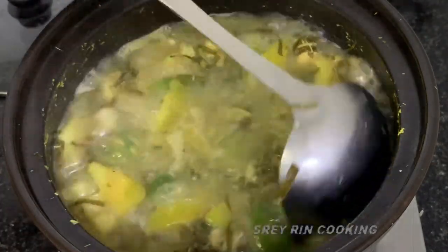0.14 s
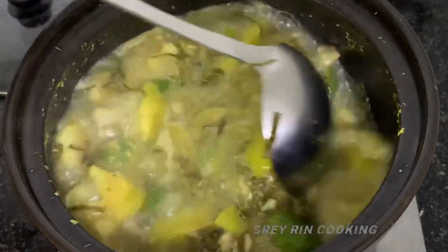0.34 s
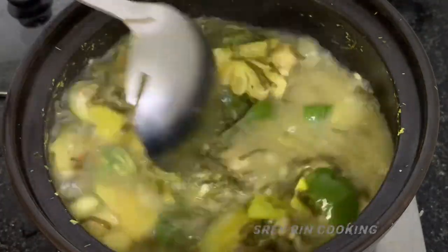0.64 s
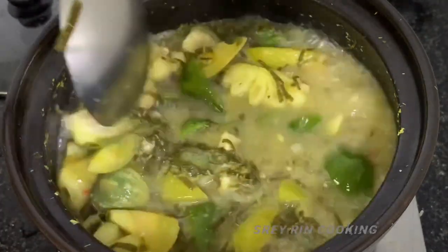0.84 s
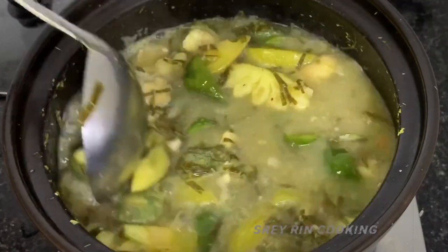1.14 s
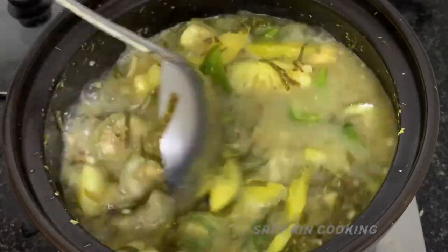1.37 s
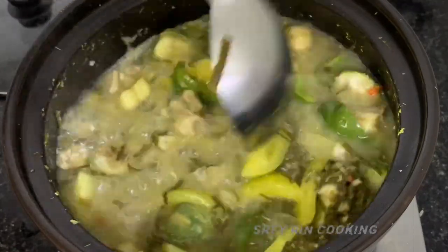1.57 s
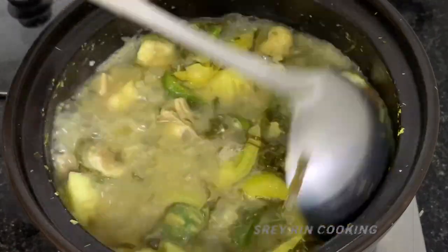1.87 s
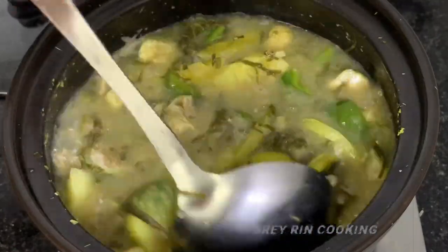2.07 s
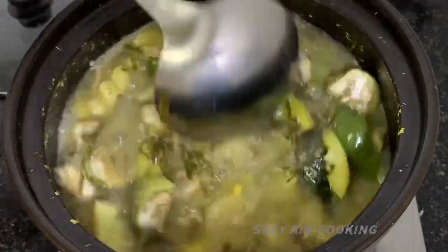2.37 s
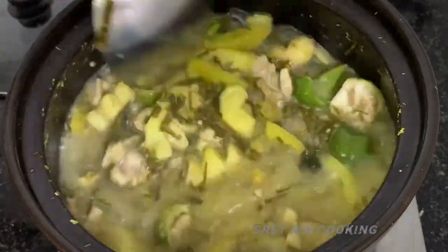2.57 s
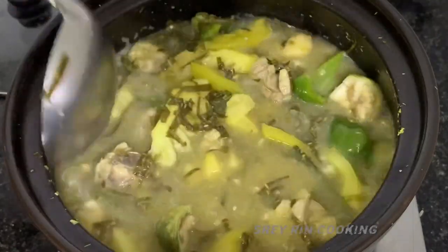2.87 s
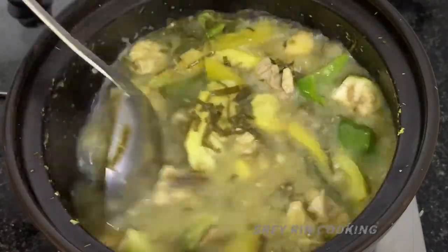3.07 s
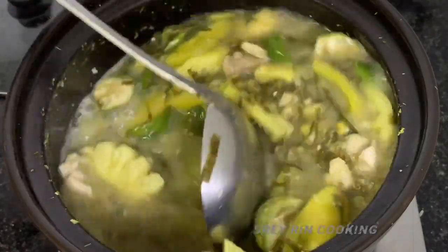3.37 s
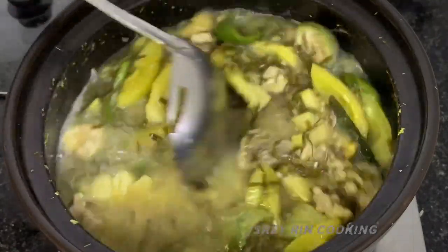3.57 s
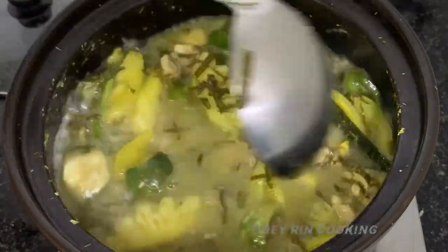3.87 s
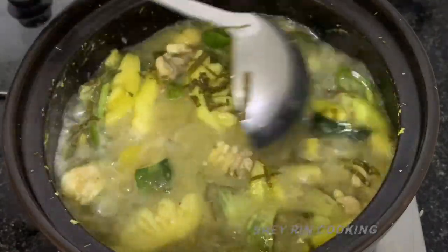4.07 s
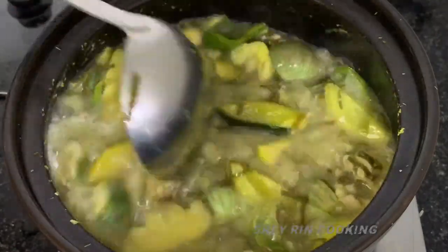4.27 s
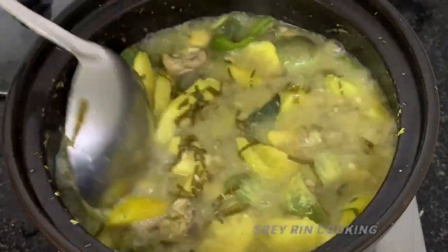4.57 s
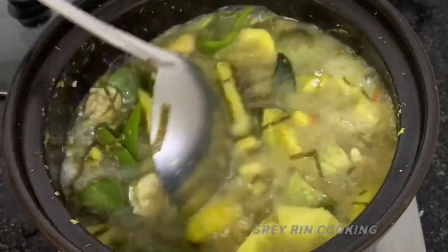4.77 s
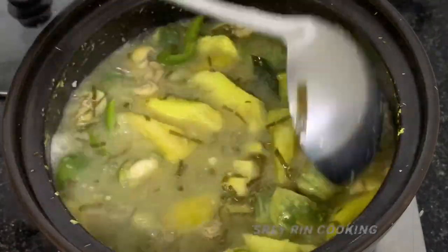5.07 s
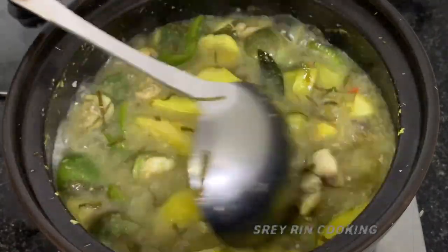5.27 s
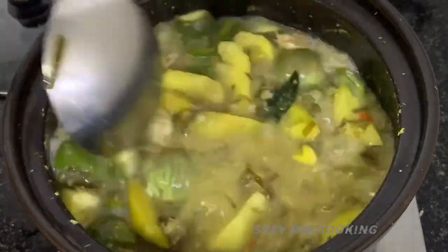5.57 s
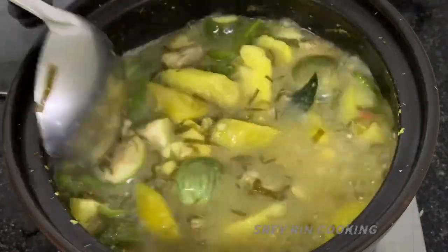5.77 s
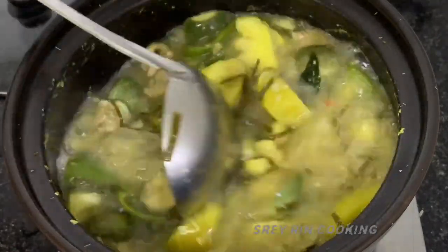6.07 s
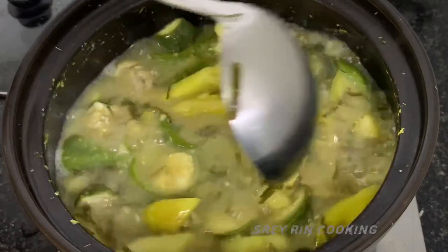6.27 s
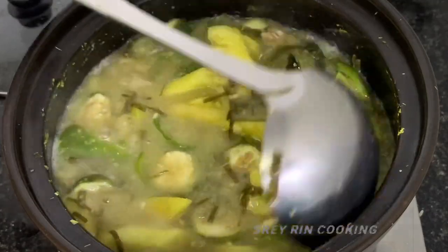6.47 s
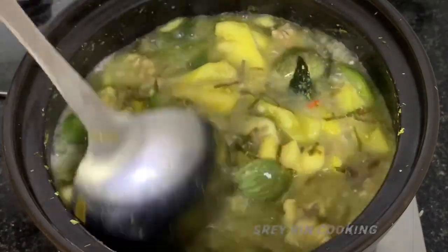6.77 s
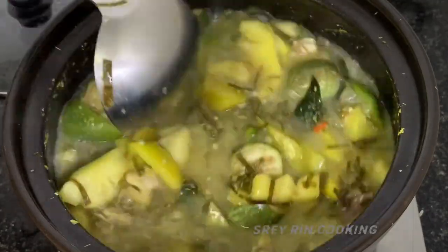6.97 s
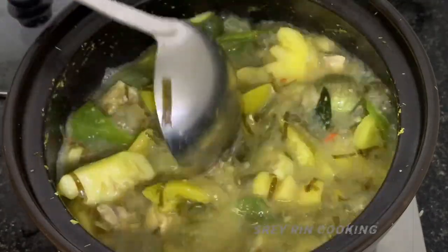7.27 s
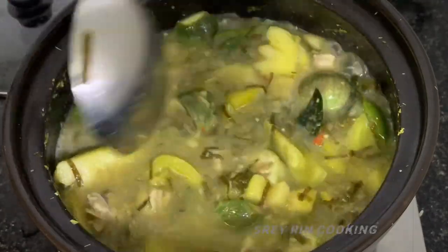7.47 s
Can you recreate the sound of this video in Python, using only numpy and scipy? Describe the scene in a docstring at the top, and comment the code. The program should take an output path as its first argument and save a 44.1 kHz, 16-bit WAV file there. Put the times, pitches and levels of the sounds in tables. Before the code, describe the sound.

Thick soup boils in a heavy pot, heard from just above the rim in a small, hard-walled kitchen. Short wet plops pop irregularly over smaller bubbles and a faint crackling froth, busiest at the very start. A gas burner rumbles and hisses softly underneath throughout. At about 1.9 seconds a steel ladle clinks sharply against the pot wall, followed by a brief soft scrape. Two more bright, quickly damped clinks come at 2.8 and 2.9 seconds, with light scraping after them and again around 3.5 seconds. The boil calms near 4 seconds and recovers by about 4.7, with the odd tiny droplet spitting. Another clink sounds at 5.7 seconds, and the bubbling eases briefly. At 7.2 seconds the ladle knocks the bottom with a muffled, wet thud. The soup keeps bubbling to the end, at about 7.6 seconds.

```python
"""Thick soup boils in a heavy pot over a rumbling, hissing gas burner in a small hard kitchen.
From the start, bursting bubbles ring as damped cavity resonators: short plops over crackling froth.
From 1.9 s a stirring steel ladle clinks on the wall and scrapes along it; the boil calms near 4 s.
It recovers, and calms again after a last clink at 5.7 s. At 7.2 s the ladle knocks the bottom, muffled
by the soup. The microphone pair is just over the rim, and the pot sounds reach its left side first."""
import sys
import numpy as np
from scipy import signal
from scipy.fft import rfft, irfft, next_fast_len
from scipy.io import wavfile
from scipy.ndimage import map_coordinates

SR = 44100
rng = np.random.default_rng(int(sys.argv[2]) if len(sys.argv) > 2 else 0)


def generate_wav(sig):
    """Save sig (samples, or channels by samples) to the path in sys.argv[1] as 16-bit PCM at SR."""
    pcm = np.round(np.clip(np.atleast_2d(sig).T, -1, 1) * 32767).astype(np.int16)
    wavfile.write(sys.argv[1], SR, pcm)


N = 336924


# the biggest bubbles: t/s, relative level/dB, f/Hz
BIG_BUBBLES = [(0.0106, -30.5, 1320), (0.0612, -27, 1010), (0.1054, -33, 1000), (0.3033, -28, 1060),
               (0.783, -41, 1560), (0.833, -31.5, 1270), (1.0085, -34.5, 1320), (1.1019, -33.5, 800),
               (1.1523, -35.5, 1050), (1.2354, -29, 1060), (1.2815, -29.5, 1050), (1.3283, -36, 970),
               (1.4262, -33.5, 630), (1.4453, -31.5, 1320), (1.506, -34.5, 1040), (1.8119, -39, 693),
               (2.3715, -42, 835), (2.4722, -30.5, 1190), (2.7139, -31.5, 930), (3.193, -29.5, 1570),
               (4.063, -34, 720), (4.7031, -41, 1080), (4.7724, -34, 1100), (4.9252, -34, 940),
               (5.1322, -34.5, 1380), (5.4116, -33.5, 1660), (5.4632, -28.5, 1050), (6.2239, -34, 956),
               (6.3717, -36, 650), (6.6337, -28.5, 2220), (7.0421, -30.5, 1980), (7.5402, -31, 1040)]
# how hard the soup seethes; stirring calms it twice: t/s, level/dB
SEETHING = [(0, -43), (.5, -51), (1.45, -51), (3.65, -48), (4.0, -66.5), (4.35, -64), (4.65, -51),
            (5.6, -53), (6.4, -58.5), (6.65, -51.5), (7.64, -51.5)]
def bubbling():
    """Superposition: single plops over a crowd of small bubbles and deep gulping pockets of steam."""
    seethe_db = envelope(SEETHING)
    seethe = amp(seethe_db)
    big = plopping(BIG_BUBBLES) + plopping(lesser_plops(seethe_db, count=72))
    small = crowd(centre_hz=1155, spread=0.553, cycles=1.0, count=1100, size=700)
    soup = big + amp(-2.5) * seethe * unit(coloured(small, AIR_SPACE))
    steam = crowd(centre_hz=205.4, spread=0.24, cycles=1.23, count=260, size=3000)
    deep = amp(-9) * seethe * unit(steam)
    near = placed(soup, pan_db=5, lead=0.0005)
    return near + amp(-8.5) * kitchen(soup) + placed(deep, pan_db=-7, lead=0.0001)


# resonances of the air over the soup: f/Hz, gain/dB
AIR_SPACE = [(100, -20.5), (250, 12), (380, -16), (620, 11), (810, 8.5), (1000, -0.5), (1450, 8),
             (1900, -4.5), (2600, -2.5), (5000, -19), (15000, -42.5)]
def plopping(rows, snap_t60=0.045):
    """Impulse excitation: a film snaps, its cavity rings, and soup falls back with a weaker plop."""
    s, db, hz = np.transpose(rows)
    wait, shift = rng.random((len(s), 2)).T
    cycles = 0.89 * (1000 / hz) ** 0.33  # lower bubbles ring for more cycles
    opening = bursts(s, amp(db - 2.5), hz, cycles, glide=0.0151)
    fall_s = s + 0.0032 + 0.013 * wait
    falling = bursts(fall_s, amp(db - 7.5), hz * (0.67 + 1.1 * shift), cycles, glide=0.022)
    snaps, t = np.zeros(N), np.arange(SR // 20) / SR
    for start, level_db in zip(s, db):
        add(snaps, start, amp(level_db - 5 - 60 * t / snap_t60) * rng.standard_normal(len(t)))
    return opening + falling + coloured(snaps + amp(-15.5) * opening, AIR_SPACE)


def lesser_plops(seethe_db, count):
    """Size scaling: harder seething makes bubbles louder and bigger, so lower. Rows: t/s, level/dB, f/Hz."""
    moment = (np.arange(count) + rng.random(count)) / count
    weakness, pitch = np.clip(rng.standard_normal((count, 2)), -1.5, 1.5).T
    surge_db = seethe_db[(moment * N).astype(int)] - seethe_db.mean()
    db = -40.5 + 0.62 * surge_db - 1.3 * weakness
    hz = 1121 * 2 ** (0.36 * pitch - 0.033 * surge_db)
    return np.transpose([moment * N / SR, db, hz])


def crowd(centre_hz, spread, cycles, count, size):
    """Incoherent sum: bubbles of random size burst at random moments."""
    pitch, strength, life = np.clip(rng.standard_normal((count, 3)), -1.6, 1.6).T
    times = rng.random(count) * N / SR
    hz = centre_hz * np.exp(spread * pitch)
    return bursts(times, np.exp(strength / 2), hz, cycles * np.exp(life / 4), glide=0.03, size=size)


def bursts(times, levels, pitches, cycles, glide, size=1100):
    """Helmholtz resonance: each bubble rings for a few cycles, rising in pitch as its hole widens."""
    waves = levels[:, None] * blip(np.arange(size) / SR, pitches[:, None], cycles[:, None], glide)
    index = np.maximum(times * SR, 0).astype(int)[:, None] + np.arange(size)
    return np.bincount(index.ravel(), waves.ravel(), N)[:N]


def blip(t, hz, cycles, glide):
    """Damped oscillation: the tone peaks after the given cycles while glide raises its pitch."""
    age = np.maximum(t, 0) * hz / cycles  # 1 at the peak
    return age * np.exp(1 - age) * np.sin(2 * np.pi * cycles * age * (1 + glide * age / (1 + age / 10)))


# ladle on the wall: t/s, level/dB, gain/dB of low modes, upper modes, top mode and crack,
# frequency ratio in contact, pan L-R/dB, left lead/s
WALL_HITS = [(1.8667, -19.5, 6.5, -28, 15, -1, 1.0, -8, 0.00026),
             (1.8717, -14.5, -4.5, -7.5, 5, -13, 0.98, 15, 0.00027),
             (2.7718, -9.5, -1.5, -3, -4, -5, 1.012, -2, .0002),
             (2.8849, -18, -6, 9.5, 1, -3, 1.0, 1, 0.000994),
             (5.7284, -10, -13.5, -3.5, 3, -9, 1.0, 5.5, 0.000983)]
# modes of pot and ladle: f/Hz, level/dB, free T60/s
STEEL_MODES = [(688, -17, 0.55), (877, -21, 0.45), (1808, -9, 0.5), (1905, 0, 0.45), (3332, -7, 0.65),
               (3358, -1.5, 0.58), (3385, -9, 0.65), (3470, -18, 0.45), (5125, -16, 0.55),
               (5268, -12.5, 0.5), (5985, -28, 0.45), (7280, -14, 0.25), (9400, -25, 0.24),
               (12960, -21, 0.12)]
# contact noise of steel on the pot: f/Hz, level/dB
CRACK_SPECTRUM = [(100, -45.5), (430, -14.5), (660, -9.5), (1300, 4.5), (2200, 5), (2900, 3), (3500, 8.5),
                  (4400, -8.5), (6800, -6.5), (8500, -30), (10000, -17), (14000, -29.5), (16000, -33.5)]
def clinks(contact_t60=0.046, free_db=-18, attack_s=0.00083):
    """Modal vibration: contact stiffens and damps the struck steel, then a faint rest rings free."""
    out, t = np.zeros((2, N)), np.arange(SR * 3 // 5) / SR
    hz, mode_db, t60 = np.transpose(STEEL_MODES)[:, :, None]
    for s, db, low_db, upper_db, top_db, crack_db, stiffening, pan_db, lead in WALL_HITS:
        # the point of contact decides which modes are excited
        contact_db = np.select([hz < 2500, hz > 10000, hz > 4500], [low_db, top_db, upper_db])
        pressed = amp(-60 * t / contact_t60) * np.sin(2 * np.pi * hz * stiffening * t)
        free = amp(free_db - 60 * t / t60) * np.sin(2 * np.pi * hz * t)
        ring = np.sum(amp(mode_db + contact_db) * (pressed + free), 0) * (1 - np.exp(-t / attack_s))
        crack = noise_burst(t, CRACK_SPECTRUM, crack_db, t60=0.048)
        room = kitchen(amp(-5.5) * ring + amp(-3) * crack)
        add(out, s, amp(db) * (placed(ring + crack, pan_db, lead) + room))
    return out


# ladle on the bottom: t/s, level/dB
BOTTOM_HITS = [(7.1625, -14)]
# modes of the bottom, the lowest building last: f/Hz, level/dB, cycles to the peak, delay/s, pan L-R/dB
BOTTOM_MODES = [(1430, -7, 1, 0.00097, 25.5), (627, -9, 1.1, 0.00077, -5), (215, -13.5, 0.76, 0.0054, -9)]
# wet slap of the blow: f/Hz, level/dB
SLAP_SPECTRUM = [(30, -44), (100, 3.5), (250, 10.5), (400, -0.5), (700, 1), (1500, 3.5), (2500, -2),
                 (4000, -8.5), (7000, -14), (9000, -17), (15000, -18.5)]
def knock():
    """Viscous damping: soup dulls a blow on the bottom to a thud; its wet slap carries into the room."""
    out, t = np.zeros((2, N)), np.arange(SR // 2) / SR
    for s, db in BOTTOM_HITS:
        slap = noise_burst(t, SLAP_SPECTRUM, db=-7, t60=0.054)
        thud = sum(placed(amp(mode_db) * blip(t - delay, hz, cycles, glide=0), pan_db, lead=0.00031)
                   for hz, mode_db, cycles, delay, pan_db in BOTTOM_MODES)
        near = thud + placed(slap, pan_db=2.5, lead=0.00062)
        add(out, s, amp(db) * (near + amp(-3) * kitchen(slap)))
    return out


# strokes along the wall: start t/s, relative level/dB, rise/s, hold/s, fade T60/s
LADLE_STROKES = [(2.059, -41.5, 0.013, 0.036, 0.2), (2.883, -46, 0.0077, 0.12, 0.62),
                 (3.389, -42.5, 0.16, 0.015, 0.13)]
# response of the rubbed wall: f/Hz, gain/dB
RUB_SPECTRUM = [(100, -22), (400, -4.5), (700, 1.5), (950, -3), (1300, 8), (1700, -2.5), (2200, 0),
                (2900, -4.5), (4500, -9), (7000, -14.5), (9000, -26), (15000, -28)]
def scraping():
    """Stick-slip friction: the ladle's edge catches on the rough wall, grain by grain."""
    pressure = sum(stroke(*row) for row in LADLE_STROKES)
    slips = pressure * grit(rate=1700, spread_db=4.5)
    rub = amp(9.5) * coloured(slips, RUB_SPECTRUM)
    return placed(rub, pan_db=4, lead=0.0006) + amp(-3) * kitchen(rub)


def stroke(start, db, rise, hold, t60):
    """Contact pressure of one stroke: it builds, holds and decays exponentially."""
    t = np.arange(N) / SR - start
    return np.clip(t / rise, 0, 1) ** 2 * amp(db - 60 * np.maximum(t - rise - hold, 0) / t60)


# spitting droplets: t/s, relative level/dB
DROPLETS = [(2.748, -37.5), (3.166, -44), (4.531, -44), (4.538, -46.5), (4.925, -42.5), (4.938, -46.5),
            (6.8544, -47.5), (7.362, -50)]
# colour of froth and droplets: f/Hz, gain/dB
FROTH_SPECTRUM = [(500, -16.5), (2500, 2.5), (4500, 0), (7000, 1.5), (10200, 6), (13500, -0.5),
                  (14400, -0.5), (15300, -23.5), (16000, -45)]
def fizzing(mean_db=-61.5, sink_db_per_s=0.24, drop_t60=0.011):
    """Shot noise: froth crackles with the seething, sinks as it is stirred in and spits an odd droplet."""
    drive_db = 0.21 * envelope(SEETHING) - sink_db_per_s * np.arange(N) / SR
    fizz_db = mean_db + drive_db - drive_db.mean()
    flicker_db = 2 * wobble(30)
    froth = amp(fizz_db + flicker_db) * unit(coloured(grit(rate=650, spread_db=6), FROTH_SPECTRUM))
    drops, t = np.zeros(N), np.arange(SR // 50) / SR
    for s, db in DROPLETS:
        add(drops, s, amp(db + 6 - 60 * t / drop_t60) * rng.standard_normal(len(t)))
    wet = froth + coloured(drops, FROTH_SPECTRUM)
    return placed(wet, pan_db=-0.5, lead=0.0003997) + amp(-8) * kitchen(wet)


# rumble of the flame and hiss of the gas jet: f/Hz, relative level/dB
FLAME_SPECTRUM = [(20, -36.5), (35, -8.5), (55, 2), (75, -3), (105, 3), (130, -6.5), (165, -1), (240, -4),
                  (340, -16), (600, -13), (1000, -21.5), (3000, -24), (4500, -27.5), (16000, -48.5)]
JET_SPECTRUM = [(1000, -11), (3000, 3), (5200, -22.5), (5620, 12), (6000, 8.5), (7500, -13), (10000, -1),
                (13500, 10), (15500, -2)]
# flame at the two microphones: f/Hz, coherence
FLAME_COHERENCE = [(60, 1), (130, 0.82), (290, 0.3), (640, 0)]
# its balance: f/Hz, pan L-R/dB
FLAME_PAN = [(60, -2), (110, -0.5), (200, -3.5), (400, -3.5), (800, 4)]
def burner():
    """Combustion and jet noise: a fluttering rumble, coherent in the bass, under a steady hiss."""
    def mid_side_gains(hz):
        angle = np.arccos(np.clip(along(FLAME_COHERENCE, hz), -1, 1)) / 2
        return amp(along(FLAME_SPECTRUM, hz)) * [np.cos(angle), np.sin(angle)]

    mid, side = filtered(rng.standard_normal((2, N)), mid_side_gains)
    left_right = np.array([mid + side, mid - side])
    flame = filtered(left_right, lambda hz: amp(np.outer([0.5, -0.5], along(FLAME_PAN, hz))))
    jet = filtered(rng.standard_normal((2, N)), lambda hz: amp(along(JET_SPECTRUM, hz)))
    flutter = amp(1.3 * wobble(10))
    return amp(-52) * flutter * unit(flame) + amp(-62.5) * unit(jet)


# reverberation time of the kitchen: f/Hz, T60/s
KITCHEN_T60 = [(150, 0.1), (500, 0.56), (1200, 0.42), (3000, 0.54), (7000, 0.56), (14000, 0.12)]
def kitchen(x, build_s=0.00067):
    """Diffuse reverberation: each frequency of the stereo tail decays at its own rate."""
    hz, t, noise = signal.stft(rng.standard_normal((2, SR * 3 // 4)), SR, nperseg=256)
    decay = 10 ** (-3 * t / along(KITCHEN_T60, hz)[:, None])
    tail = signal.istft(noise * decay * (1 - np.exp(-t / build_s)), SR, nperseg=256)[1]
    return signal.fftconvolve(x[None], tail / np.linalg.norm(tail[0]), axes=1)[:, :len(x)]


def placed(x, pan_db, lead):
    """Level and time difference: the left side is pan_db above the right and lead seconds earlier."""
    late = filtered(x, lambda hz: np.exp(-2j * np.pi * hz * lead))
    return np.array([x * amp(pan_db / 2), late * amp(-pan_db / 2)])


def noise_burst(t, spectrum, db, t60):
    """Impact transient: coloured noise with exponential decay."""
    return unit(coloured(rng.standard_normal(len(t)), spectrum)) * amp(db - 60 * t / t60)


def grit(rate, spread_db):
    """Poisson process: about rate impulses a second, of uneven size, rms 1."""
    sizes = amp(spread_db * np.clip(rng.standard_normal(N), -2, 2)) * rng.choice([-1, 1], N)
    return unit(sizes * (rng.random(N) < rate / SR))


def wobble(rate):
    """Random modulation: a smooth curve, rate knots a second."""
    return map_coordinates(rng.standard_normal(4096), [np.arange(N) * rate / SR], mode="wrap")


def coloured(x, points, size=4096):
    """Minimum-phase filter: folding the cepstrum makes the shape (f/Hz, gain/dB) causal."""
    cepstrum = irfft(np.log(amp(along(points, np.fft.rfftfreq(size, 1 / SR)))))
    fold = 1 + np.sign(size // 2 - np.arange(size))
    fold[0] = 1
    kernel = irfft(np.exp(rfft(cepstrum * fold)))
    return signal.oaconvolve(x, kernel)[:len(x)]


def filtered(x, response):
    """Linear filter: the spectrum of x times a complex response of frequency."""
    size = next_fast_len(x.shape[-1] + 8192, True)
    return irfft(rfft(x, size) * response(np.fft.rfftfreq(size, 1 / SR)), size)[..., :x.shape[-1]]


def along(points, hz):
    """Interpolation of (f/Hz, value) points on a log axis."""
    f, values = np.transpose(points)
    return np.interp(np.log(hz + 1), np.log(f + 1), values)


def envelope(points):
    """Interpolation of (t/s, value) points at every sample."""
    return np.interp(np.arange(N) / SR, *np.transpose(points))


def add(track, s, sound):
    """Superpose a sound on the track at time s."""
    rest = track[..., max(round(s * SR), 0):][..., :sound.shape[-1]]
    rest += sound[..., :rest.shape[-1]]


def amp(db):
    """Decibels to amplitude ratio."""
    return 10 ** (np.asarray(db) / 20)


def unit(x):
    """Normalise to rms 1."""
    return x / np.sqrt(np.mean(x ** 2) + 1e-20)


def scene():
    """Superposition: the pressures of all sources on the stove add."""
    return burner() + bubbling() + fizzing() + clinks() + knock() + scraping()


def record(dry, bass_hz=35, top_hz=15700):
    """Band limiting and saturation: the microphones shed deep bass, round off peaks and cut the top."""
    thin = signal.sosfilt(signal.butter(2, bass_hz, "highpass", fs=SR, output="sos"), dry)
    rounded = thin / (1 + np.abs(thin) ** 6) ** (1 / 6)
    return filtered(rounded, lambda hz: hz < top_hz)


dry = scene()
out = record(dry)
generate_wav(out)
```